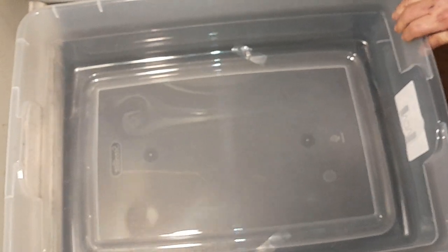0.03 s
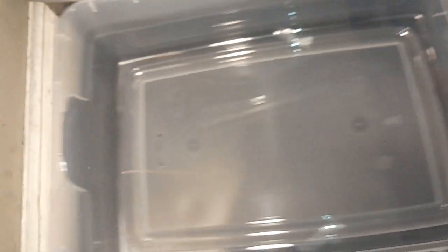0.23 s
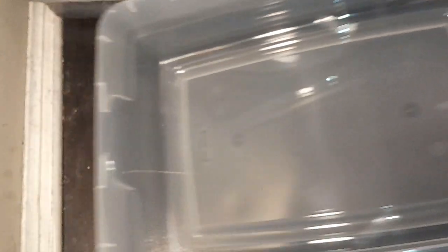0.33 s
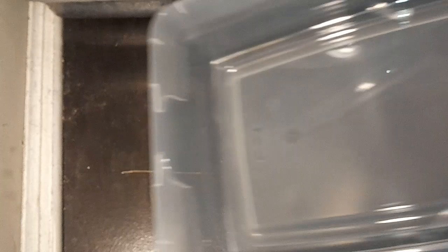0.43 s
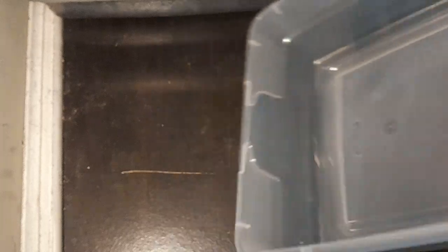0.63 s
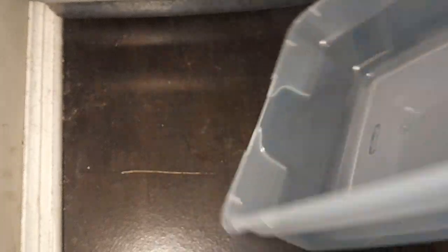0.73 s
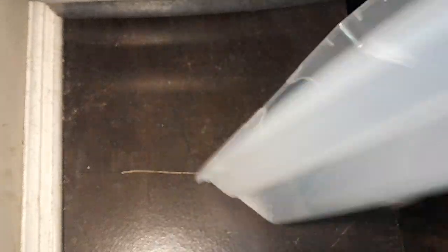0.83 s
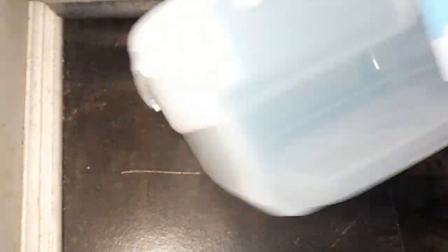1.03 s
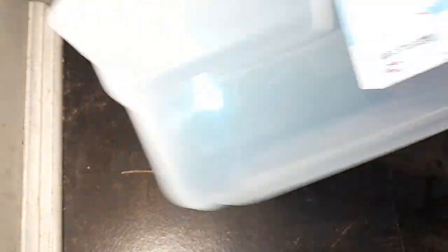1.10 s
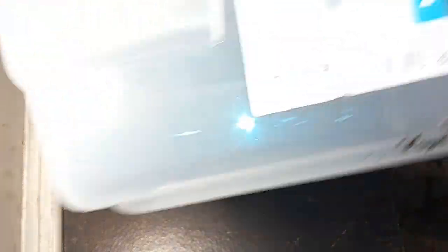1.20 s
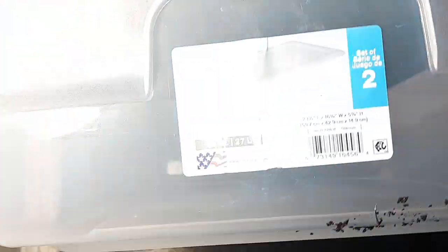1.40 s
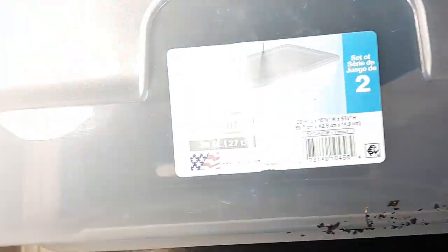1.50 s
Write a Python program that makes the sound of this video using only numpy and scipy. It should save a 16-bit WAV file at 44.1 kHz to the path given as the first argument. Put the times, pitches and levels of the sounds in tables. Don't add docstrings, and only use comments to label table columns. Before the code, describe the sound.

A hard plastic storage bin scrapes and judders out of another bin, knocking as it frees

```python
import sys
import numpy as np
from scipy import signal
from scipy.fft import rfft, irfft, next_fast_len
from scipy.io import wavfile
from scipy.ndimage import map_coordinates

SR = 44100
rng = np.random.default_rng(int(sys.argv[2]) if len(sys.argv) > 2 else 0)


def generate_wav(signal):
    frames = np.transpose(np.atleast_2d(signal))
    scaled = np.clip(frames, -1, 1) * 32767
    pcm = np.round(scaled).astype(np.int16)
    wavfile.write(sys.argv[1], SR, pcm)


def voltage_ratio(decibels):
    exponent = np.asarray(decibels, float) / 20
    return 10 ** exponent


N = 68355

# f/Hz, density/dB
AIR_COLOUR = [(65, 7.5), (320, -30), (770, -2.5), (2500, -33), (8000, -16.5), (9100, -32), (13200, -17.5),
              (16500, -18)]
# f/Hz, t60/s
ROOM_DECAY = [(100, 0.724), (1000, 0.51), (4000, 0.18), (14000, 0.64)]
# f/Hz, left over right/dB
STEREO_LEAN = [(60, 3.5), (240, 1), (950, 4.5), (3770, 2.5), (9000, 1), (15000, 0.5)]
# f/Hz, correlation/1
PORT_LIKENESS = [(100, 1), (250, 0.88), (500, 0.56), (1000, 0.05), (3000, 0.025), (12000, 0.024)]
# t/s, gain/dB
PHONE_GAIN = [(0, -6), (.04, -16.5), (.065, -17), (.1, -3.5), (.825, 4), (.84, -8), (.862, -10.5),
              (.866, 4), (.965, -1), (.98, -4), (1.003, -2), (1.007, 1), (1.115, -4), (1.13, -7),
              (1.18, -7), (1.2, 0), (1.55, -8)]

# f/Hz, level/dB, t60/s
FLOOR_MODES = [(58, -1, .2), (81, 0, .4)]
# f/Hz, level/dB, t60/s
PANEL_MODES = [(115, -4.5, 0.24), (143, 4, 0.13)]
# f/Hz, level/dB, t60/s
WALL_MODES = [(196.6, 5, 0.069), (217.9, -7, 0.15), (258.5, -18, 0.11), (327.3, -8.5, 0.062)]
# f/Hz, level/dB, t60/s
HELD_WALL_MODES = [(179.4, 0, 0.23), (228, 4, 0.17), (254.7, -1.5, 0.083), (356, -2.5, 0.064)]
# f/Hz, level/dB, t60/s
RIM_MODES = [(454.5, -8.5, 0.14), (502, 10.5, 0.017), (548, -17, 0.14), (690, 1.5, 0.055),
             (775, -6.5, 0.059), (900, -4.5, 0.05), (1075, -14, 0.075), (1213, 3, 0.01), (1450, -3, 0.048),
             (1894, -18, 0.043), (2097, -23, 0.045), (3000, -5.5, 0.025)]

# t/s, crack/dB, floor boom/dB, side panel/dB, wall/dB
KNOCKS = [
    (.182, -25, -61, -82, -69),
    (0.2114, -11.5, -24.5, -17, -17.5),
    (0.244, -25, -40, -25, -58),
    (0.8703, -16.5, -27, -23.5, -9),
    (.905, -26.5, -37, -37, -42),
    (1.0078, -33.5, -22, -20.5, -11.5),
    (1.054, -26.5, -32.5, -56, -26.5),
    (1.22, -42, -61.5, -43.5, -35),
    (1.267, -38.5, -56, -40.5, -38),
    (1.288, -42, -42.5, -47.5, -36.5),
]
# f/Hz, density/dB
CRACK_COLOUR = [(200, -39), (400, -12.5), (750, -13.5), (1200, -15), (2300, -22.5), (4000, -39.5),
                (8000, -71)]
# t/s, burst/dB, rim ring/dB, centre of the ringing f/Hz
SNAPS = [
    (0.182, -38, -30, 457),
    (0.2113, -26, -47, 1000),
    (0.215, -31.5, -30, 705),
    (0.8672, -33.5, -42, 1160),
    (0.873, -39, -28, 696),
    (1.0075, -39, -59, 900),
    (1.0115, -30.5, -30.5, 931),
    (1.211, -48.5, -48.5, 720),
    (1.268, -55.5, -40, 1450),
    (1.283, -43.5, -41.5, 690),
]
# f/Hz, density/dB
SNAP_COLOUR = [(500, -10), (1200, 6), (3000, -2), (5500, -11), (7500, -8.5), (9500, -23.5), (14000, -18),
               (16500, -24)]
# t/s, level/dB, f/Hz, t60/s
PLUCKS = [(.085, -46.5, 344, 0.31), (.1, -47, 1012, 0.45), (0.2114, -21.5, 1024, 0.05),
          (.2125, -19, 770, 0.037), (.214, -26, 1660, .04), (.216, -22, 2600, .04), (.24, -35, 1050, 0.027),
          (.455, -29.5, 782, 0.043), (.548, -23.5, 400, 0.057), (.24, -21.5, 568, .05),
          (0.286, -47, 450, 0.037), (0.286, -21.5, 1033, 0.042), (0.331, -27, 449, .07),
          (.369, -23.5, 1527, 0.064), (0.424, -22.5, 1113, 0.055), (0.424, -24.5, 432, 0.1),
          (.492, -26, 620, 0.043), (.525, -25, 539.5, 0.14), (.532, -36.5, 725, 0.19),
          (.585, -28, 584, 0.067), (.662, -26.5, 600, 0.03), (.695, -33.5, 616, 0.052),
          (.7, -29.5, 350, 0.11), (.725, -36, 668, .07), (.75, -30.5, 368, 0.13), (.812, -39, 375, 0.098),
          (.8672, -11, 1255, 0.0094), (0.8687, -30.5, 1700, 0.028), (.872, -22, 1020, 0.036),
          (.874, -21.5, 351, 0.084), (0.878, -38, 2380, 0.028), (0.869, -28, 3182, 0.011),
          (.8702, -13.5, 760, 0.01), (0.879, -25, 1940, 0.035), (0.8857, -25, 1300, .03),
          (.873, -30, 637, 0.054), (1.0108, -24, 916, 0.074), (1.0113, -32, 3000, 0.0068),
          (1.014, -18.5, 698, 0.039), (1.018, -29.5, 2100, .05), (1.016, -29, 1450, 0.064),
          (1.02, -22.5, 259, 0.058), (1.285, -38.5, 111, 0.25), (1.28, -43, 666, 0.11)]

# t/s, grit/dB, rim rub/dB
SLIDE_LEVELS = [(0, -63, -43.5), (.06, -79, -48), (.1, -57, -51), (.18, -45, -38), (.2, -63, -51.5),
                (.23, -43.5, -37), (.3, -30.5, -33), (.37, -28.5, -36.5), (.432, -26.5, -33.5),
                (.46, -34, -43), (.53, -52.5, -66), (.62, -74, -42.5), (.81, -95, -67.5), (.845, -58, -57),
                (1.15, -54, -52), (1.22, -57, -54.5), (1.29, -55.5, -59.5), (1.55, -64, -88)]
# f/Hz, width/Hz, level/dB
SQUEAL_PEAKS = [(438.2, 23, 0.5), (1043, 40, -1), (1490, 92, -7), (2069, 69, -6.5), (2930, 15, -19.5),
                (3630, 190, -14), (4040, 53, -22), (7470, 370, -9)]
# f/Hz, density/dB
HISS_COLOUR = [(710, -2), (1200, -4.5), (3710, 0.5), (8100, -8), (9100, -19.5), (13500, -8.5),
               (15800, -10.5), (16500, -7.5)]
# f/Hz, density/dB
RUB_COLOUR = [(150, -55.5), (250, -17), (441, -6), (491, -3.5), (2500, -17), (3250, -27), (5500, -120)]
# t/s, wall drumming/dB, floor boom/dB
JUDDER_LEVELS = [(0, -27.5, -21.5), (.055, -40.5, -19.5), (.07, -70, -32), (.14, -63, -52),
                 (.19, -38.5, -26.5), (.3, -42, -25), (.44, -34.5, -29.5), (.49, -26.5, -32),
                 (.53, -17, -37), (.56, -21, -23.5), (.65, -28, -39), (.74, -28, -30), (.81, -35, -36),
                 (.84, -36.5, -34.5), (1.17, -61.5, -34), (1.29, -51.5, -56), (1.385, -53, -33),
                 (1.41, -88, -77)]
# t/s, f/Hz
SLIP_RATE = [(.44, 204), (.5, 214.5), (.525, 255), (.55, 172), (.6, 226), (.635, 191), (.69, 179),
             (.745, 248), (.77, 184), (.8, 205), (.83, 203)]
# f/Hz, density/dB
RATTLE_COLOUR = [(160, -31), (280, 8.5), (452, -69), (564, -13), (762, -37), (4000, -50), (5200, -63),
                 (8800, -120)]


def unit(x):
    return x / np.sqrt(np.mean(x ** 2) + 1e-20)


def along(points, hz):
    f, value = np.transpose(points)
    return np.interp(np.log(hz + 1), np.log(f + 1), value)


def curves(rows):
    times, *columns = np.transpose(rows)
    return [np.interp(np.arange(N) / SR, times, column) for column in columns]


def wobble(rate):
    return map_coordinates(rng.standard_normal(400), [np.arange(N) * rate / SR])


def filtered(x, response):
    size = next_fast_len(N + SR // 2)
    spectrum = rfft(x, size) * response(np.fft.rfftfreq(size, 1 / SR))
    return irfft(spectrum, size)[..., :N]


def resonant(x, peaks):
    def response(f):
        total = 0
        for k, (centre, width, db) in enumerate(peaks):
            bandpass = 1j * f * width / (centre * centre - f * f + 1j * f * width)
            total = total + (-1) ** k * voltage_ratio(db) * bandpass
        return total
    return filtered(x, response)


def widths(modes):
    return [(hz, np.log(1000) / np.pi / t60, db) for hz, db, t60 in modes]


def coloured(x, colour):
    return filtered(x, lambda hz: voltage_ratio(along(colour, hz)))


def spread(pair):
    def mid_side(hz):
        turn = np.arccos(np.clip(along(PORT_LIKENESS, hz), -1, 1)) / 2
        return np.array([np.cos(turn), np.sin(turn)])
    mid, side = filtered(pair, mid_side)
    return np.array([mid + side, mid - side])


def air():
    tone = unit(coloured(rng.standard_normal((2, N)), AIR_COLOUR))
    return voltage_ratio(-52.5 + 2.2 * wobble(6.67)) * spread(tone)


def room(x):
    hz, t, z = signal.stft(rng.standard_normal((2, SR // 2)), SR, nperseg=256)
    decay = voltage_ratio(-60 * t / along(ROOM_DECAY, hz)[:, None])
    tail = signal.istft(z * decay, SR, nperseg=256)[1]
    tail = tail / np.linalg.norm(tail[0])
    send = filtered(x.mean(0), lambda hz: hz ** 2 / (hz ** 2 + 300 ** 2))
    send = np.pad(send, (250, 0))
    return signal.fftconvolve(send[None], tail, axes=1)[:, :N]


def ring(modes, t, attack_s, scatter_db, stagger=0):
    hz, db, t60 = np.transpose(modes)[..., None]
    level_db = db + scatter_db * rng.standard_normal((2, len(modes), 1))
    phase = 2 * np.pi * rng.random((2, len(modes), 1)) * [[[stagger]], [[1]]]
    tones = voltage_ratio(level_db - 60 * t / t60) * np.sin(2 * np.pi * hz * t + phase)
    return tones.sum(1) * (1 - np.exp(-t / attack_s))


def knocks():
    body, cracks = np.zeros((2, N + SR)), np.zeros((2, N + SR))
    t = np.arange(SR // 2) / SR
    burst = voltage_ratio(-60 * t / 0.0081) + 0.9 * voltage_ratio(-60 * t / 0.11)
    for s, crack_db, boom_db, panel_db, wall_db in KNOCKS:
        start = round(s * SR)
        at = slice(start, start + len(t))
        body[:, at] += voltage_ratio(boom_db + 10) * ring(FLOOR_MODES, t, 0.0031, 1.2)
        body[:, at] += voltage_ratio(panel_db + 7.0) * ring(PANEL_MODES, t, 0.0061, 0.93)
        body[:, at] += voltage_ratio(wall_db + 1.5) * ring(WALL_MODES, t, 0.01, 1.0)
        cracks[:, at] += voltage_ratio(crack_db + 13.5) * burst * rng.standard_normal((2, len(t)))
    return spread(body[:, :N] + coloured(cracks[:, :N], CRACK_COLOUR))


def snaps():
    spot_db = 9
    bursts, rim = np.zeros((2, N + SR)), np.zeros((2, N + SR))
    t = np.arange(SR // 8) / SR
    burst = (voltage_ratio(-60 * t / 0.0088) + 0.42 * voltage_ratio(-60 * t / 0.063)) * (1 - np.exp(-t / 0.0003))
    for s, burst_db, ring_db, centre_hz in SNAPS:
        start = round(s * SR)
        at = slice(start, start + len(t))
        bursts[:, at] += voltage_ratio(burst_db + 11.5) * burst * rng.standard_normal((2, len(t)))
        near = [(hz, db - spot_db * np.log2(hz / centre_hz) ** 2, t60) for hz, db, t60 in RIM_MODES]
        rim[:, at] += voltage_ratio(ring_db + 5) * ring(near, t, 0.0012, 0.44, stagger=0.83)
    return spread(rim[:, :N] + coloured(bursts[:, :N], SNAP_COLOUR))


def plucks():
    attack_cycles, sag, lag_s = 0.65, 0.13, 0.00021
    out = np.zeros((2, N + SR))
    t = np.arange(SR // 8) / SR
    late = np.clip(t - np.array([[lag_s], [0]]), 0, None)
    for s, db, hz, t60 in PLUCKS:
        start = round(s * SR)
        turns = hz * late * (1 - sag * np.minimum(late / t60, 1) / 2)
        envelope = voltage_ratio(db - 60 * late / t60) * (1 - np.exp(-late * hz / attack_cycles))
        out[:, start:start + len(t)] += envelope * np.sin(2 * np.pi * turns)
    return out[:, :N]


def grains(rate, spread_db, noise):
    chance, size = rng.random((2, N))
    sizes = voltage_ratio(-spread_db * np.log(size + 1e-4))
    slips = (chance < rate / SR) * sizes * rng.standard_normal((2, N))
    return unit(unit(slips) + noise * rng.standard_normal((2, N)))


def slide():
    grit_db, rub_db = curves(SLIDE_LEVELS)
    drive = voltage_ratio(2.14 * wobble(90.18)) * grains(5100, spread_db=-1, noise=1.8)
    squeal = unit(sum(voltage_ratio(9.6 * wobble(34.99)) * resonant(drive, [peak]) for peak in SQUEAL_PEAKS))
    hiss = unit(coloured(drive + 0.33 * squeal, HISS_COLOUR))
    rub = unit(coloured(drive + 0.44 * squeal, RUB_COLOUR))
    return spread(voltage_ratio(grit_db + 1.0) * hiss + voltage_ratio(rub_db) * rub)


def judder():
    wall_db, boom_db = curves(JUDDER_LEVELS)
    slip_hz, = curves(SLIP_RATE)
    cycles = np.cumsum(slip_hz * (1 + 0.05 * wobble(60))) / SR
    slips = unit(np.diff(np.floor(cycles), prepend=0) * voltage_ratio(4.54 * wobble(110)))
    stray = grains(230, spread_db=-3.0, noise=0.97)
    drive = slips + 0.5 * stray
    soft = filtered(drive, lambda hz: 1 / (1 + 1j * hz / 400) ** 2)

    flex = 0.64 * np.sin(2 * np.pi * cycles) * np.array([[1], [0.3]])
    walls = flex + 0.67 * unit(resonant(soft, widths(HELD_WALL_MODES)))
    walls = walls + voltage_ratio(-9.5) * unit(resonant(stray, widths(PANEL_MODES)))

    rattle = unit(coloured(stray + 0.37 * slips, RATTLE_COLOUR))
    rattle = rattle + 0.52 * unit(resonant(soft, widths(RIM_MODES)))
    rattle_db = -11.5 + 0.95 * np.clip(wall_db + 25.5, -9, 0)

    boom = unit(resonant(rng.standard_normal((2, N)), widths(FLOOR_MODES)))
    return spread(voltage_ratio(wall_db) * (walls + voltage_ratio(rattle_db) * rattle) + voltage_ratio(boom_db) * boom)


def scene():
    hits = knocks() + snaps()
    notes = plucks()
    friction = slide() + judder()
    answer = voltage_ratio(-1) * room(hits + 0.49 * notes) + voltage_ratio(-5.5) * room(friction)
    bins = hits + notes + friction + spread(answer)
    halves = np.array([[0.5], [-0.5]])
    return filtered(bins, lambda hz: voltage_ratio(along(STEREO_LEAN, hz) * halves)) + air()


def top_cut(x):
    return signal.sosfilt(signal.butter(12, 15860, fs=SR, output="sos"), x)


def record(dry):
    top_hz, bass_hz = 15860, 38
    gain_db, = curves(PHONE_GAIN)
    mix = filtered(dry * voltage_ratio(gain_db), lambda hz: (hz < top_hz) * (1j * hz / (bass_hz + 1j * hz)) ** 4)
    return top_cut(mix)


dry = scene()
out = record(dry)
generate_wav(out)
```